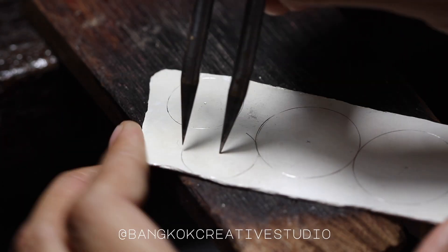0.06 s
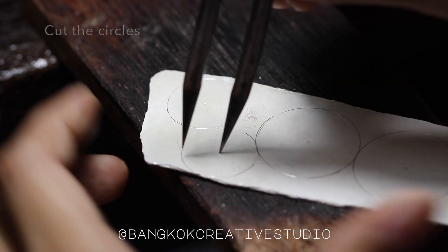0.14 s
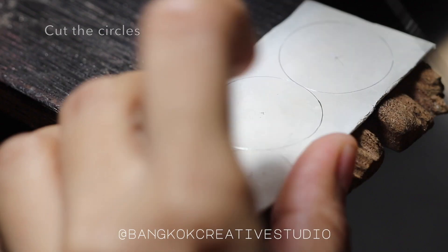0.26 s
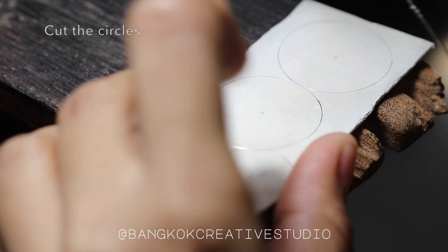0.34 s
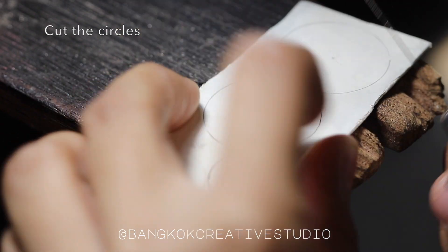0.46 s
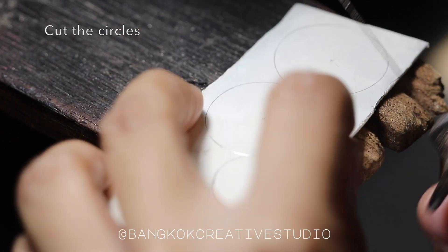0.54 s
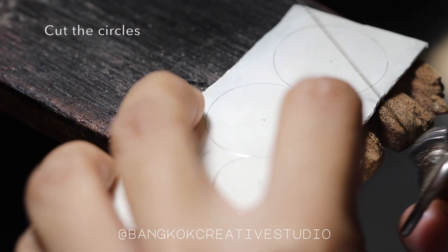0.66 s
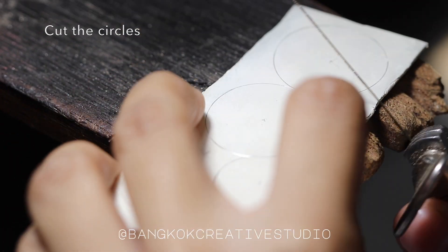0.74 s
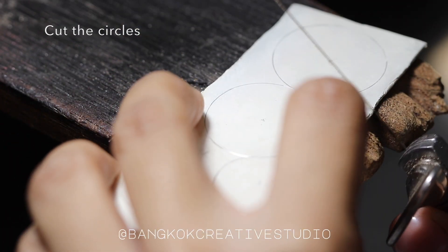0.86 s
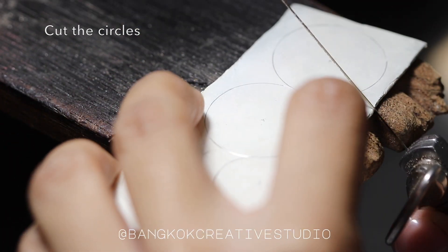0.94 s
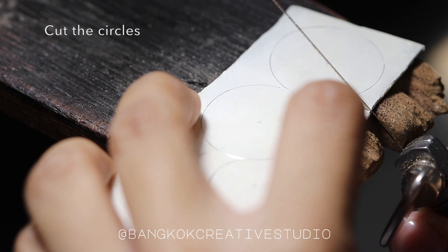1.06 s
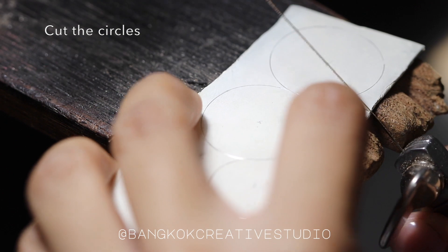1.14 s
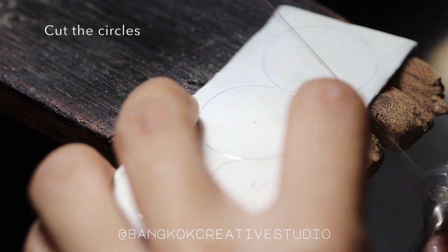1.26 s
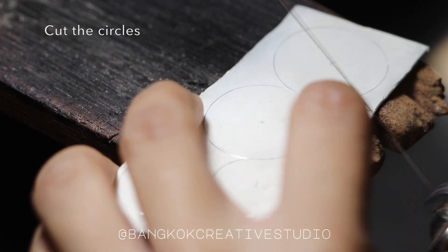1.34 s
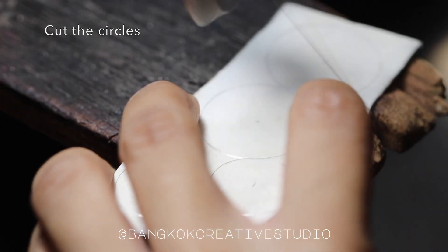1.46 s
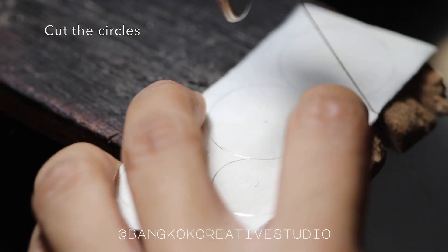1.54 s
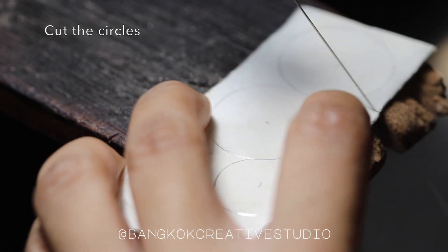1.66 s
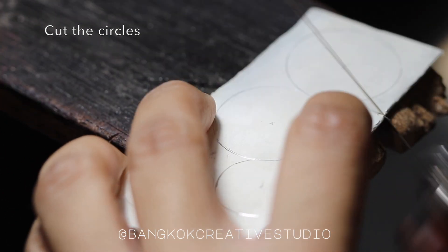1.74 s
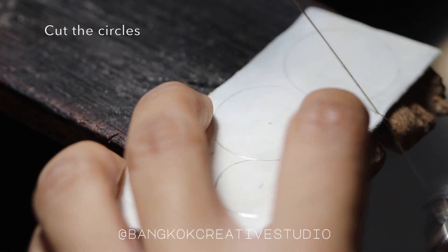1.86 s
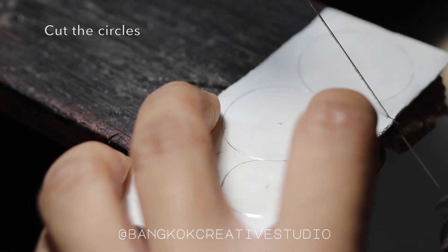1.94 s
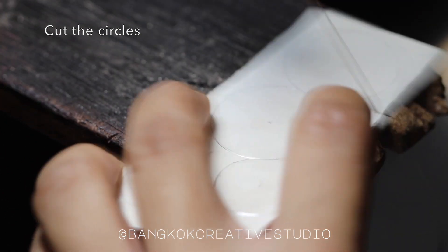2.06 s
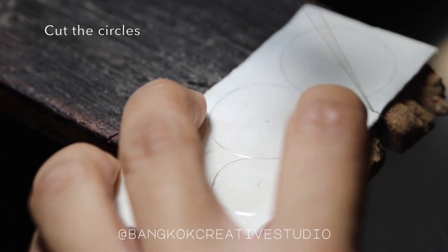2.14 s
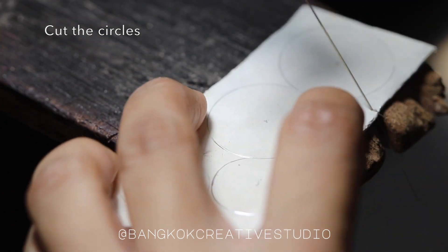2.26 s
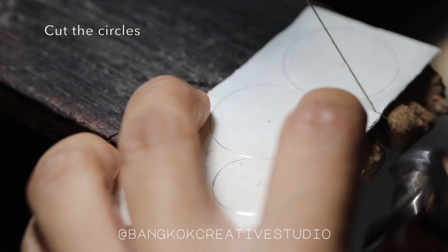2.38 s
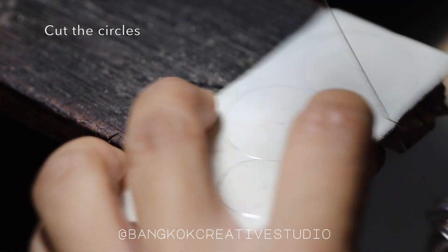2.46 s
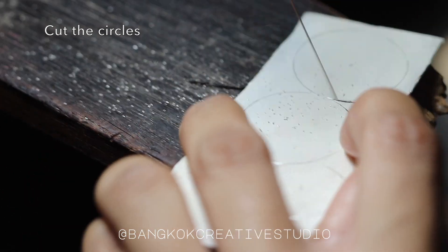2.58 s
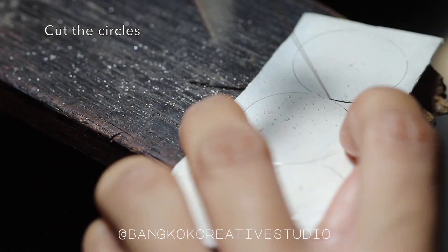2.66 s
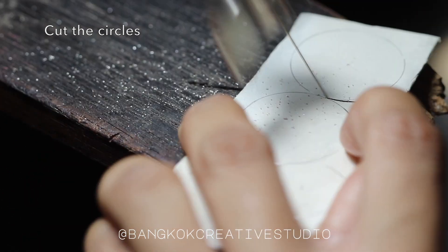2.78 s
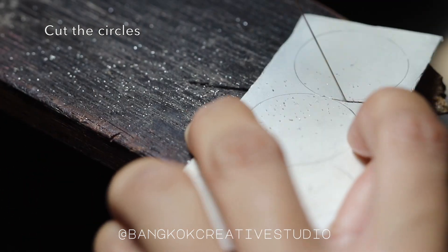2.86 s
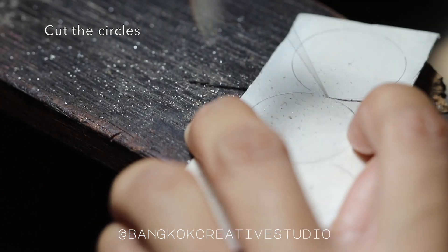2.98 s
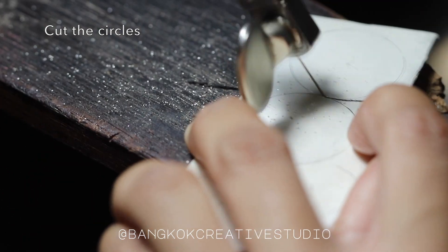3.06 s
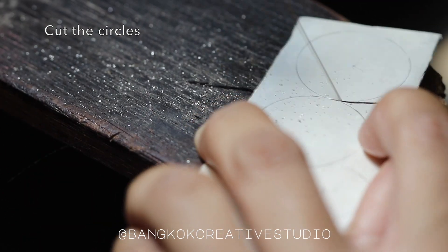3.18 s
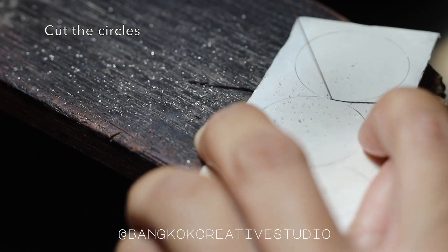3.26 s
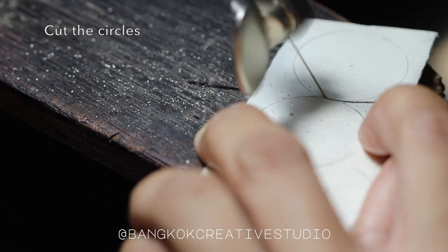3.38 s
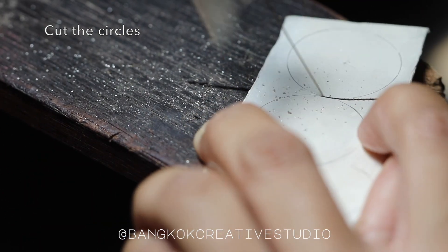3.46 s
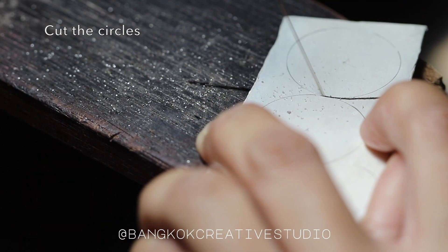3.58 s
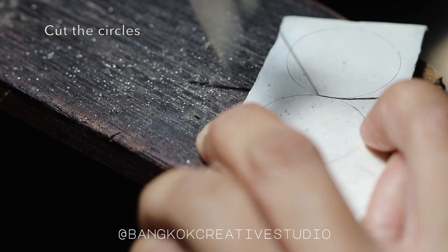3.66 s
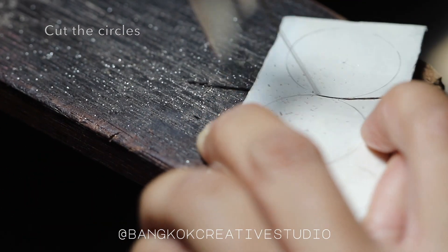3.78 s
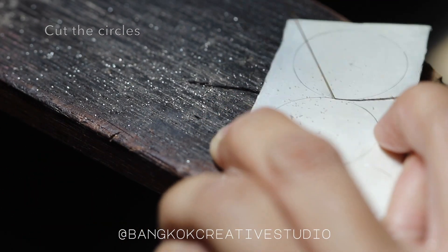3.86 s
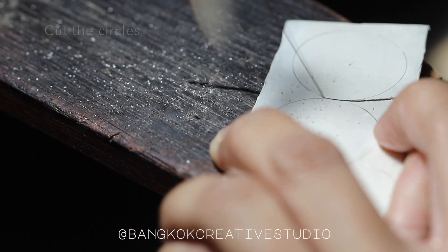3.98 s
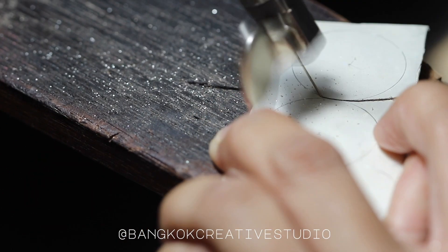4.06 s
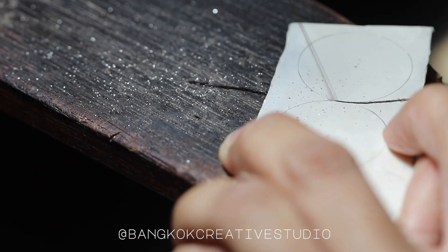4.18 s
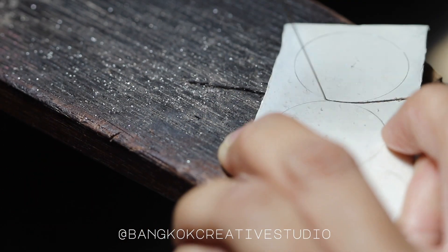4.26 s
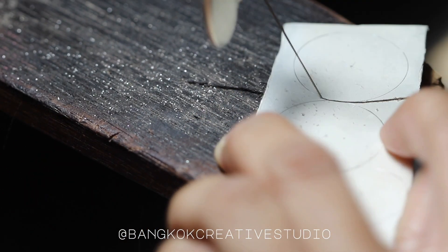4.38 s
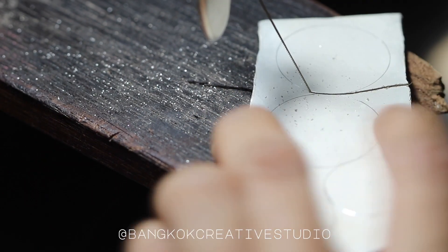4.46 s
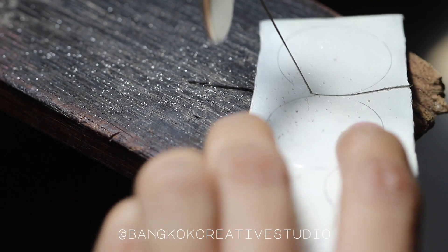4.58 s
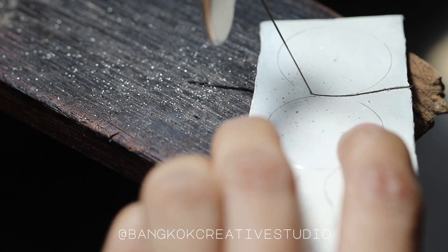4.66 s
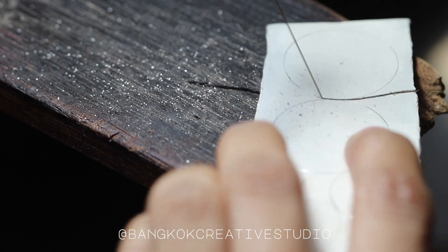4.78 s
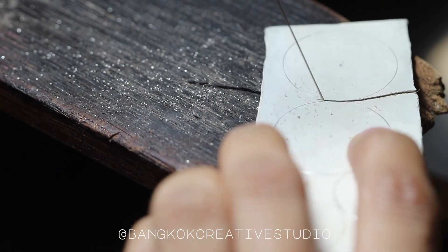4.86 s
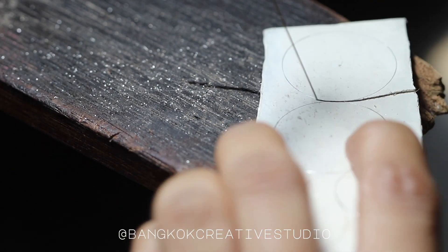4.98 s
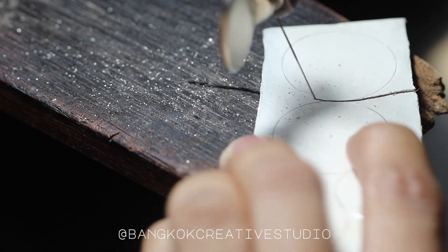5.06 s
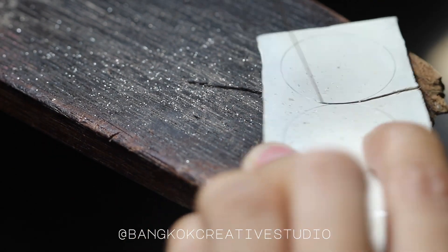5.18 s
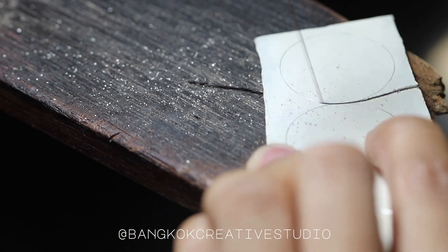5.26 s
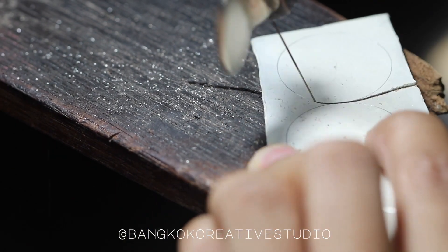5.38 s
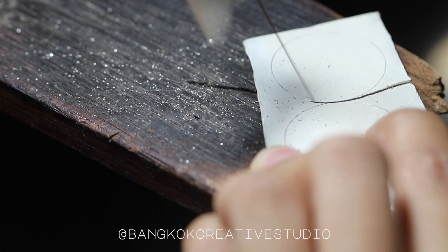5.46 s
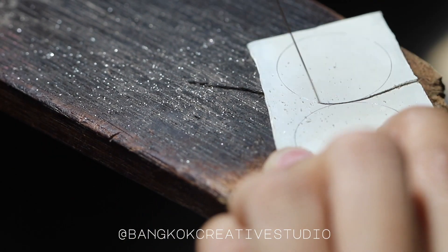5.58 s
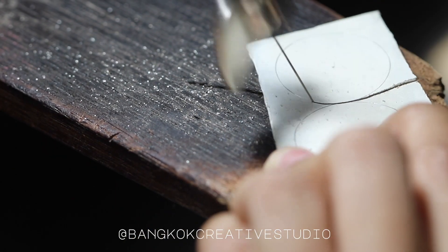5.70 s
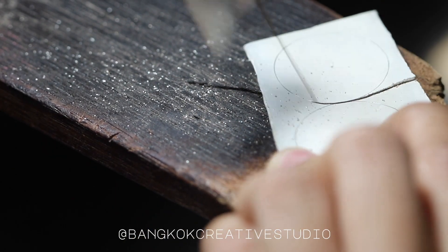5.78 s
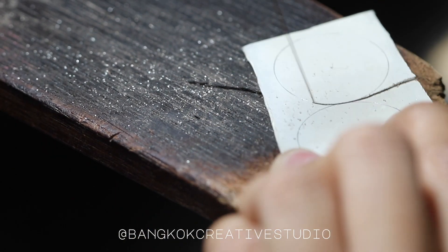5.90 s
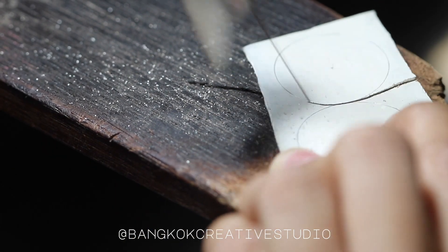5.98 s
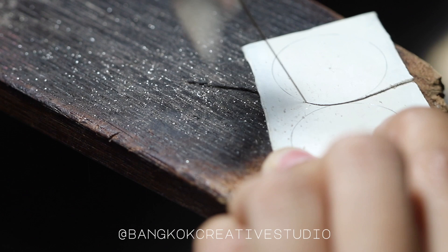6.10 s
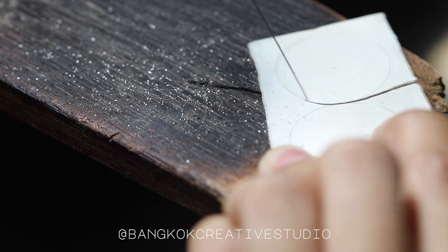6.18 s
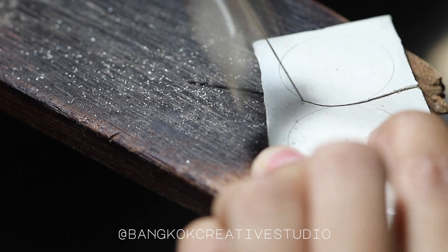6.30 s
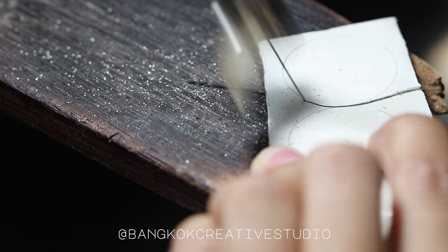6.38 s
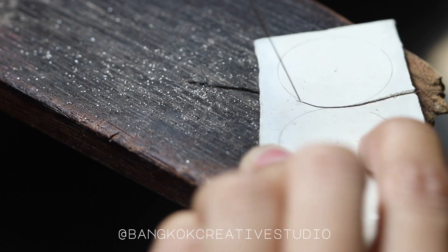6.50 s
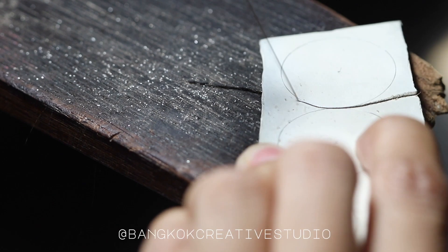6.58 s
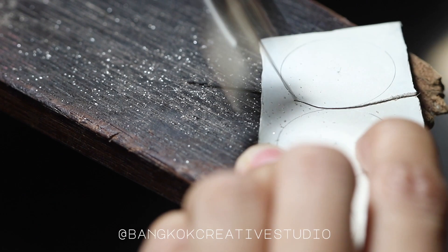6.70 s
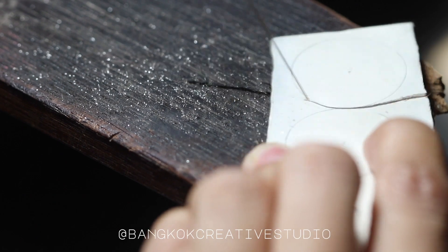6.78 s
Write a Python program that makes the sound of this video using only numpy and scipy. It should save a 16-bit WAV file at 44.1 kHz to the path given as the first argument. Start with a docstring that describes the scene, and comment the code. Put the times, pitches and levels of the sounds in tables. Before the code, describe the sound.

Near-silent workshop hum, then a fine jeweller's saw rasps through thin sheet metal in quick, uneven strokes, gritty and ringing, close up.

```python
"""The soft, wavering hum of a small workshop comes first, with two faint bumps, all made from noise and fading tones.
Then a jeweller's saw cuts sheet metal on a wooden bench pin, close to a stereo microphone.
Each tooth catches and lets go; the jolts ring the pin, the sheet and the taut blade in its frame.
Down-strokes bite hard, up-strokes only scrape; the sheet is gripped anew twice, which shifts its ring.
Short squeaks (one faint and high before the sawing), single ringing modes, a knock and echoes are added."""
import sys
import numpy as np
from scipy import signal
from scipy.fft import rfft, irfft
from scipy.io import wavfile
from scipy.ndimage import uniform_filter1d

SR = 44100
rng = np.random.default_rng(int(sys.argv[2]) if len(sys.argv) > 2 else 0)


def put_to_file(sound):
    """Save the sound as 16-bit audio at rate SR, in the file named by the first command-line argument."""
    columns = np.atleast_2d(sound).T  # one column per channel
    safe = np.clip(columns, -1, 1)
    whole_steps = np.round(safe * 32767)
    wavfile.write(sys.argv[1], SR, whole_steps.astype(np.int16))


N = 301644
T = np.arange(N) / SR

# Colour of the workshop hum: pitch_hz, density_db_per_hz
SHOP_COLOUR = [(15, -65), (25, -44), (125, -14), (158, -14.5), (219, -6.5), (286, -8), (621, -14),
               (691, -17.5), (1060, -19.5), (1150, -19.5), (5140, -42), (7280, -42), (15000, -55.5)]
SHOP_DB = -55
# Faint far bumps: start_s, pitch_hz, t60_s (time to fade 60 dB), level_db
BUMPS = [(0.515, 213, 0.22, -43), (0.554, 353, 0.052, -45)]
# Echoes in bands: pitch_hz, t60_s, level_db (relative), likeness of left and right (0-1)
WALL_BANDS = [(172, 0.95, -12, 0.94), (527, 0.31, -18, 0.3), (1310, 0.6, -5, 0.06), (2660, 0.34, -3.5, 0),
              (6650, 0.4, -10, 0.16), (11500, 0.13, 2, 0.1)]
# Where the saw sits between the microphones: pitch_hz, left_above_right_db
LEFT_RIGHT = [(100, -0.5), (250, -1.5), (500, 0.3), (1000, 1), (2000, -4.5), (4000, -2.5), (8000, -4),
              (15000, -3)]
# Short squeaks, one faint and high before the sawing, the others among the strokes:
# middle_s, pitch_hz, length_s (middle to 1/e), level_db
SQUEAK_TONES = [(1.059, 7120, 0.012, -68), (1.908, 4230, 0.0065, -48), (3.895, 3520, 0.008, -40.5),
                (3.6, 5640, 0.0081, -50), (4.224, 3520, 0.0067, -41), (6.204, 1610, 0.015, -32)]
# Modes that sing out for a while: start_s, rise_s, hold_s, t60_s, pitch_hz, width_hz, glide_octaves,
# level_db, left_lead_rad
SINGING_MODES = [(1.46, 0.015, 0.036, 0.32, 1160, 41, 0.026, -31, 0.34),
                 (2.6, 0.023, 0.053, 0.21, 2200, 28, 0.012, -39.5, -1.2),
                 (2.35, 0.016, 0.031, 0.28, 1900, 40, 0.0068, -29.5, 0),
                 (2.496, 0.007, 0.035, 0.33, 710, 19, 0.053, -29.5, 0.23),
                 (2.493, .005, 0.014, 0.2, 1490, 22, 0.02, -31, .7),
                 (2.66, 0.036, 0.046, 0.61, 1380, 47.6, 0.064, -25.5, -0.39),
                 (2.686, 0.014, 0.025, 0.26, 2400, 49, 0.03, -29.5, -0.13),
                 (2.696, 0.021, 0.04, 0.43, 413, 16, 0.012, -26, 0.44),
                 (3.22, 0.017, 0.1, 0.22, 377, 23, -0.019, -33, 0.4),
                 (3.41, .02, .05, 0.3, 1217, 35, -0.0032, -28.5, 0.99),
                 (3.53, 0.018, 0.026, 0.63, 1040, 30, -0.013, -34.5, 0.93),
                 (3.699, 0.019, 0.063, 0.42, 408, 20, -0.014, -25, -0.1),
                 (3.838, 0.02, 0.012, 0.1, 1010, 59, -0.02, -31, 1),
                 (4.3, 0.025, 0.059, 0.5, 1010, 42, 0.026, -24.5, 0.72),
                 (5.655, 0.011, 0.052, 0.21, 2900, 150, 0, -35, 0.61),
                 (5.36, 0.018, 0.033, 0.18, 2900, 68, 0.015, -40, 0.57),
                 (6.182, 0.017, 0.045, 0.16, 2250, 200, -0.02, -40, 0),
                 (6.506, 0.0076, 0.026, 0.11, 2600, 120, -0.014, -35, 0.51),
                 (5.865, 0.018, 0.028, 0.18, 2624, 70, 0.0065, -41, 0.37),
                 (2.24, 0.022, 0.033, 0.8, 2250, 45, 0.012, -36, -2.3),
                 (2.49, .005, .02, 0.39, 2160, 36, 0.026, -41, -2.4),
                 (1.94, 0.0089, 0.047, 0.27, 590, 54, -0.015, -29, -0.53),
                 (4.9, .02, 0.037, .3, 1960, 60, -0.009, -52, -1),
                 (4.9, 0.014, 0.044, 0.27, 5550, 250, -0.0074, -43, 1),
                 (5.661, 0.021, 0.062, 0.3, 6030, 160, -0.026, -34, 1),
                 (5.987, 0.018, 0.04, 0.17, 6300, 200, 0.027, -45, 1),
                 (5.99, 0.018, 0.029, 0.18, 6300, 180, -0.0006, -44, 1),
                 (6.15, 0.028, 0.076, 0.27, 5600, 120, -0.00032, -43, 1),
                 (6.307, 0.018, 0.044, 0.47, 5500, 180, 0.017, -41, 0.77),
                 (6.314, 0.017, 0.049, 0.48, 3740, 46, -0.032, -38, 1),
                 (6.32, 0.012, 0.077, 0.61, 1640, 120, -0.02, -30, 0.084),
                 (6.642, 0.021, 0.048, 0.32, 1590, 120, 0.044, -24.5, 0.41),
                 (6.65, 0.015, 0.028, 0.24, 5200, 160, 0.08, -40, 1),
                 (6.64, 0.019, 0.058, 0.31, 13700, 700, 0.024, -48, 1),
                 (6.525, 0.0084, 0.0088, 0.081, 11000, 2500, 0, -35, 1),
                 (6.738, 0.015, 0.052, 0.3, 6800, 120, 0.015, -49.5, 1),
                 (6.64, 0.018, 0.03, 0.14, 8100, 87, 0.0073, -32, 1),
                 (6.644, 0.011, 0.025, 0.21, 3730, 130, -0.051, -33, 1)]

# Times when the sheet is gripped anew: start_s
GRIP_S = [2.667, 4.745]
# Ringing modes of each part, in the five tables below:
# pitch_hz, width_hz, first_grip_db, second_grip_db, third_grip_db, left_lead_rad
PIN_MODES = [(138, 7.2, -2.5, -16.5, -14, 0.071), (214, 69, -48, -27.5, -36, 0.037),
             (244, 41.5, 0.5, -10.5, 1, 0.16), (281.5, 28.7, -2.5, 2, 3.5, 0.22),
             (364.7, 26, -0.5, -6, -7, 0.36), (407.3, 26.3, -2, 0, 3.5, 0.12), (568, 152, -3, -6, -2, 0.37)]
SHEET_LOW_MODES = [(667, 106, 14.5, 2, -5.5, 0.0093), (754, 37, 3, 7.5, 9, 0.11),
                   (882, 215, -10.5, 0, -0.5, 0.08), (1028, 76, -5, -7, -4.5, 1),
                   (1135, 22.7, 9, -4, -4.5, 0.19), (1160, 184, -11.5, -6, -6, 1),
                   (1445, 146, -12, -2, -11.5, 0.31), (1573, 114, -11, -1, -6.5, 0.),]
SHEET_HIGH_MODES = [(1762, 100, 4.5, 0, 1.5, 0.44), (1934, 54, -4.5, -24, -3.5, -1.83),
                    (2052, 51, 6, -9.5, -6, -0.6), (2200, 136, 2, -35, -4, -1.9),
                    (2667, 95, 0, -1.5, -8, 1), (2967, 340, -6.5, -6, -9.5, 0.78),
                    (3384, 230, -9.5, -11.5, -18, -0.5), (3704, 350, -12.5, -15, -15, 1)]
BLADE_MODES = [(4470, 530, 6, -4, -58, 1.55), (5160, 170, 2.5, 2, -15, 2.5),
               (5523, 117, -12, -1.5, -2.5, 1.44), (5544, 170, -3, 1.5, -8, 0.72),
               (6633, 123, -14, -0.5, -2, 1.97), (6890, 123, -6, -7, 0.5, 1.3),
               (7530, 230, 5, -2, -7.5, 4.2), (8280, 246, -3, -1, -2, 1.7)]
OVERTONE_MODES = [(9310, 860, -6, -4.5, -4.5, 11), (10280, 270, -8, -20, -15, -5),
                  (11260, 160, 1, -5, -4, -4), (12100, 150, -22, -9, -6, 2), (12600, 190, -20, -10, -6, 1),
                  (13830, 320, -11, -13, -7, -2.5)]  # of the blade
# Overtones against the blade, one value for each grip: level_db
OVERTONES_DB = [-13.5, -10.5, -10]

# The next four tables have one row each for pin, low sheet, high sheet, blade, overtones.
# Random pitch drift as the free length changes, in widths of one filter stage:
# first_grip_widths, second_grip_widths, third_grip_widths
DRIFT_WIDTHS = [(0.068, 0.057, 0.1), (.07, 0.037, 0.063), (0.097, 0.18, 0.22), (.7, 0.6, 0.26),
                (.4, 0.36, 0.37)]
# Rasp that does not ring: first_grip_db, second_grip_db, third_grip_db
RASP_DB = [(-16, -24, -17.5), (-2.5, -3.5, -4.5), (-5.5, -8.5, -6), (-5.5, -4.5, -19), (-1.5, -4, -8.5)]
# Crack of a snag that does not ring: level_db
CRACK_DB = [-12, -8, -7.5, -5, -0.5]
# How a part follows a stroke: rise_share, fade_share, ease_db (quick change as the bite eases),
# turn_db (change as the blade turns), focus_db (change of the favoured mode during the glide)
FOLLOW = [(.95, 0.98, -3.5, 4, 0.5), (1.01, 1.24, -2.5, -3, 6), (1.05, 1.18, -10, -2.5, -13),
          (1.2, 0.44, -16.5, -9, 0), (1.2, 0.54, -13.5, 0, -17)]
# Colour of rasp and crack: pitch_hz, density_db_per_hz
RASP_COLOUR = [(53, -56), (90, -45), (271, 5.5), (329, 10), (409, 1), (508, -7.5), (1740, -6.5),
               (2410, -2.5), (2630, -10), (3960, -14.5), (6800, -8), (13000, -30.5), (14200, -31),
               (15800, -49)]

# A tooth snags and jerks free: start_s, low_sheet_db, and above that pin_db, high_sheet_db, blade_db
SNAGS = [(1.311, -32, 25, -19, -8), (1.349, -23, 3, -6, -6), (1.484, -9.5, 7, 5, 4.5),
         (1.497, -9.5, 6, -15, -15), (1.533, -15, -8, -10, -1), (1.704, -28, -12, 9, 6),
         (1.753, -23, -17, 11.5, 1), (1.936, -12, -14, 2, -11.5), (1.942, -4, -15, -5.5, -10),
         (2.132, -12, 4.5, 4, -9), (2.149, -14, -8, 5.5, -7), (2.155, -2, 1, -6, -13.5),
         (2.165, -4, 0, -9.5, -11), (2.34, -19.5, -6, 0, -0.5), (2.362, -16.5, -13, 3, 2),
         (2.503, -4.5, -23, -1.5, -12), (2.677, -21, -12, -4, -15), (2.834, -26.5, -8, -5, -13),
         (3.018, -9, -28, -0.5, -0.5), (3.068, -7, 5, -4, -16), (3.075, -3.5, 5, -26, -19),
         (3.11, -15.5, 4, -20, -16), (3.137, -13, 5, -12, -12), (3.387, -9.5, -14, -1, 0.5),
         (3.423, -10, -16, -6, 1), (3.461, -15.5, 14, -17, -11), (3.552, -22, -14, 1, 0),
         (3.667, -19, -5, 3, -7), (3.829, -20, -11, -9, -29), (3.858, -26.5, -8, -1, -16),
         (3.949, -28.5, -6, 5.5, -23), (3.993, -18.5, 3, -1.5, 4), (4.281, -37, -5, -16, 8),
         (4.329, -0.5, 9.5, -15, -10), (4.391, -12.5, -8, -2, 3), (4.526, -37, -2, 2, -21),
         (4.752, -37, 12, 8, -29), (4.824, -34, -2, 22, 11), (4.862, -13.5, -11, -14, -8),
         (5.028, -17, 16, 3, -14), (5.221, -24, -3, 2, 8), (5.356, -20, 20, -9, 2),
         (5.399, -5, 5.5, -8, -11), (5.69, -11.5, -3, -15, -13), (5.819, -32, -3, -16, -15),
         (5.891, -31.5, -5, 0, 7), (5.934, -9.5, -4, -23, -22), (5.987, -10, 0, -20, -19),
         (6.006, -9.5, 3, -8, -15), (6.037, -8, -2, -6, -4), (6.088, -14, -3, -21, -24),
         (6.175, -28, -10, 6, 1), (6.198, -21, -10, 2, -2), (6.314, -13, 10, -10, -28),
         (6.414, -13.5, -22, 6, -16), (6.523, -21, -13, 8, 3), (6.541, -16, -20, 5, 7.5),
         (6.557, -20.5, 10.5, -11, 0), (6.637, -3.5, -6, -27, -35), (6.734, -9.5, -21, -6, -30),
         (6.792, -28, -10, -5, -2)]
# Cutting strokes: start_s, rise_s, low_sheet_hold_s, pin_hold_s, high_sheet_and_blade_hold_s,
# fade_db_per_s, low_sheet_db, and above that pin_db, high_sheet_db, blade_db;
# then the favoured modes: sheet_hz, sheet_glide_octaves, pin_hz, pin_glide_octaves, blade_hz
DOWN_STROKES = [(1.302, 0.0082, 0.0036, 0.0076, 0.0035, 550, -34.5, 12.5, 7.5, 2.5, 930, -0.13, 256, 0.012, 5600),
                (1.342, 0.0084, 0.013, 0.019, 0.0062, 220, -30, 7.5, -0.5, -7.5, 710, 0.64, 238, 0.12, 5620),
                (1.468, 0.02, 0.026, 0.053, 0.028, 126, -20, 3.5, -3.5, -3, 1036, -0.081, 314, -0.21, 5760),
                (1.926, 0.0096, 0.022, 0.044, 0.007, 195, -27, -3.5, -1, -7, 815, -1.6, 410, -0.075, 5960),
                (2.129, 0.0031, 0.0044, 0.0035, 0.005, 400, -26, 2.5, 6.5, 3, 1610, -0.06, 283, 0, 5640),
                (2.144, 0.0094, 0.098, 0.09, 0.0095, 131, -23.5, 3, 6, 3.5, 1660, -0.93, 268, -0.38, 5700),
                (2.493, 0.0033, 0.01, 0.038, 0.0046, 185, -22, -4.5, 0.5, -11, 723, -0.28, 338, -0.18, 5000),
                (2.667, 0.029, 0.054, 0.06, 0.046, 130, -23.5, 8, 1, 0.5, 1440, -0.11, 272, 0.45, 6300),
                (3.001, 0.02, 0.0085, 0.017, 0.013, 300, -25.5, -4.5, 3.5, 5, 1620, -1, 388, -0.067, 6640),
                (3.059, 0.0052, 0.092, 0.088, 0.0065, 96, -25, 3, -0.5, 2.5, 795, -0.31, 368, 0.032, 6800),
                (3.334, 0.017, 0.037, 0.08, 0.083, 113.6, -19.5, 5.5, -8, -7.5, 894, 0.64, 310, 0.27, 6500),
                (3.656, 0.026, 0.059, 0.058, 0.053, 141, -20, 2.5, -1, -1.5, 1710, -0.4, 282, 0.36, 6260),
                (3.989, 0.022, 0.072, 0.075, 0.061, 166, -23, -0.5, -0.5, -2, 1543, -0.34, 383, 0.052, 6960),
                (4.319, 0.0081, 0.077, 0.15, 0.078, 176, -23.5, 6.5, -4.5, -5, 968, -0.36, 317, -0.17, 6600),
                (4.848, 0.023, .05, 0.053, 0.048, 263, -26, -6.5, 3, -5.5, 770, -0.066, 270, -0.4, 6600),
                (5.006, 0.035, 0.051, 0.07, 0.036, 148, -21.5, 3.5, -1.5, -3, 1080, -0.008, 291, 0.063, 6700),
                (5.341, 0.022, 0.08, 0.09, 0.058, 183, -20.5, 4, -4.5, -5, 940, 0.14, 334, -0.059, 6080),
                (5.671, 0.014, 0.067, 0.052, 0.057, 169, -17.5, 3.5, -7, -9.5, 945, 0.19, 350, -0.11, 6000),
                (5.971, 0.031, 0.068, 0.1, 0.062, 164, -18, 1, -6, -8, 950, 0.12, 324, 0.42, 6370),
                (6.297, 0.028, 0.054, 0.043, 0.046, 200, -22, 4, -3.5, -3.5, 1090, 0.35, 314, 0.2, 6400),
                (6.619, 0.0041, 0.074, 0.045, 0.091, 210, -25, 11.5, -10.5, -6, 770, 0.54, 390, -0.29, 7400)]
# Return strokes, some in several pushes, and one short knock at 5.929 s:
# start_s, rise_s, hold_s, low_sheet_db, and above that pin_db, high_sheet_db, blade_db;
# then the favoured modes: sheet_hz, pin_hz, blade_hz
UP_STROKES_AND_KNOCK = [(1.695, 0.011, 0.025, -29, -15, 0, -4.5, 790, 244, 4560),
                        (1.746, 0.0071, 0.015, -36, -7, 2, 0, 2230, 244, 5660),
                        (1.79, 0.0099, 0.022, -40.5, -8, 3, -10, 2100, 244, 5630),
                        (2.337, 0.004, 0.0096, -33, -14, 5, 4, 2840, 284, 5470),
                        (2.355, 0.011, 0.03, -27.5, -22, 3.5, 1, 2100, 284, 5300),
                        (2.879, 0.022, 0.02, -39.5, -1, 6, 1, 1500, 313, 6700),
                        (3.201, 0.055, 0.015, -38, -19, 3.5, 0.5, 1080, 356, 5440),
                        (3.535, 0.0033, 0.067, -42.5, -13, 6, 7, 1020, 298, 5700),
                        (3.880, 0.033, 0.031, -43.5, 5.5, 0, -18, 1050, 365, 5790),
                        (4.19, 0.0041, 0.085, -42.5, 3, -0.5, 1, 1230, 312, 8200),
                        (4.749, 0.056, 0.17, -49.5, 8.5, 10.5, 4.5, 1960, 286, 5600),
                        (4.813, 0.024, 0.047, -49.5, 5, 14, 11.5, 1940, 275, 6435),
                        (5.202, 0.0073, 0.056, -38.5, 9, 3.5, 3.5, 1700, 254, 6100),
                        (5.521, 0.0072, 0.15, -51, 11, 5.5, 8, 1000, 318, 6000),
                        (5.594, 0.0096, 0.015, -57, -2, -4, -10, 1040, 320, 5840),
                        (5.860, 0.028, 0.0065, -49, 10, 9.5, 16, 1380, 314.7, 5500),
                        (5.929, 0.0058, 0.0017, -32.5, 4, -10, -2, 710, 436, 5640),
                        (6.157, 0.021, 0.062, -35, -6, -0.5, 0.5, 1530, 318, 5440),
                        (6.248, 0.0041, 0.0095, -31.5, 3, -24, -17, 776, 313, 5800),
                        (6.509, 0.024, 0.016, -31.5, 6.5, 6, 6.5, 1810, 310, 5920)]

# A snag: its force builds over CATCH_S and dies over SKID_S (exponential time constants)
CATCH_S, SKID_S = 0.0013, 0.0041
# Teeth: median rate, spread of the gaps (natural log), spread of the jolts, grit, throb of the force
TEETH_HZ, TEETH_JITTER, TEETH_SPREAD_DB, GRIT_DB, CHATTER_DB = 898.9, 0.55, 5.6, -6, 1.62
# Modes: boost and reach of the favoured one, slow and fast level wander, left-right phase wander
FAVOUR_DB, FAVOUR_OCTAVES, WANDER_DB, BITE_DB, WANDER_RAD = 9.5, 0.24, 3, 3, 1.14
# Strokes: TURN_S is the time before a down-stroke in which the blade turns
UP_FADE_DB_S, RISE_POWER, TURN_S, EASE_S = 225, 0.95, 0.15, 0.019
GLIDE_S = 0.086  # modes slide as the blade runs through
RUMBLE_DB, TOP_HZ = -72, 15900


def undb(db):
    """Turn decibels into a plain amplitude factor."""
    return 10 ** (np.asarray(db) / 20)


def rms(x):
    """Average strength of a signal."""
    return np.sqrt(np.mean(x ** 2))


def unit(x):
    """Scale to rms 1."""
    return x / rms(x)


def colour(x, points):
    """Shape the spectrum by (Hz, dB) points, joined by straight lines over log pitch."""
    hz, db = np.transpose(points)
    size = x.shape[-1]
    f = np.maximum(np.arange(size // 2 + 1) * SR / size, 1)
    gain = undb(np.interp(np.log(f), np.log(hz), db))
    return irfft(rfft(x) * gain, size)


def walk(rate):
    """Random levels, a new one every 1 / rate s, joined by slopes; spread 1."""
    k = int(SR / rate)
    steps = np.repeat(rng.standard_normal(N // k + 1), k)
    return unit(uniform_filter1d(steps, k)[:N])


def bandpass(x, lo, hi):
    """Keep the sound between two pitches."""
    return signal.sosfilt(signal.butter(2, [lo, hi], "bandpass", fs=SR, output="sos"), x)


def shop():
    """Distant workshop hum: coloured noise that wavers a little, plus two faint bumps as fading tones."""
    mid, side = rng.standard_normal((2, N))
    side = colour(side, [(100, -30), (300, -10.5), (1500, 0.5), (15000, 0)])  # bass nearly alike in both ears
    stereo = mid + side * np.array([[1], [-1]])
    hum = colour(stereo, SHOP_COLOUR) * undb(0.7 * walk(25))
    out = hum / rms(hum.mean(axis=0)) * undb(SHOP_DB)
    for start, hz, t60, db in BUMPS:
        t = np.maximum(T - start, 0)
        out = out + undb(db) * np.sin(2 * np.pi * hz * t) * np.exp(-np.log(1000) * t / t60)
    return out


def walls(x):
    """Echoes thicken into a tail that dies band by band; the bass is alike left and right."""
    t, response = T[:SR], 0
    centres = np.array(WALL_BANDS)[:, 0]
    edges = np.sqrt(centres[1:] * centres[:-1])
    for (_, t60, db, like), lo, hi in zip(WALL_BANDS, [60, *edges], [*edges, 18000]):
        mid, side = rng.standard_normal((2, SR))
        tail = np.sqrt(1 + like) * mid + np.sqrt(1 - like) * side * np.array([[1], [-1]])
        fade = np.exp(-np.log(1000) * t / t60) * (1 - np.exp(-t / 0.0019))
        loudness = np.sqrt(2 * np.sum(fade ** 2))
        response = response + undb(db) * bandpass(tail * fade, lo, hi) / loudness
    mono = x.mean(axis=0)[None]
    return signal.fftconvolve(mono, response, axes=1)[:, :N]


def squeaks():
    """Brief rough squeaking tones: sines that swell and fade, with a fast random change of level."""
    rough = 1 + walk(340)
    tones = 0
    for middle, hz, length, db in SQUEAK_TONES:
        swell = np.exp(-((T - middle) / length) ** 2)
        tones = tones + undb(db) * swell * np.sin(2 * np.pi * hz * T)
    return rough * tones


def sings():
    """Tooth jolts hold a single narrow mode ringing; it slides a little as the blade runs through."""
    jolts, out = teeth()[0], np.zeros((2, N))
    for start, rise, hold, t60, hz, width_hz, glide, db, lead in SINGING_MODES:
        a = int(start * SR)
        t = T[:min(N - a, SR // 2)]  # half a second at most
        sliding_hz = hz * 2 ** (glide * np.minimum(t / GLIDE_S, 1))
        spin = np.exp(2j * np.pi * np.cumsum(sliding_hz) / SR)
        pole = np.exp(-np.pi * width_hz / SR)
        # shift the mode to 0 Hz, smooth it there, and shift it back
        z = spin * signal.lfilter([np.sqrt(2 * (1 - pole ** 2))], [1, -pole], jolts[a:a + len(t)] / spin)
        fade_db = -60 * np.maximum(t - rise - hold, 0) / t60
        z = z * np.minimum(t / rise, 1) * undb(db + fade_db)
        out[:, a:a + len(t)] += np.imag(z * np.exp(0.5j * lead * np.array([[1], [-1]])))
    return out


def teeth():
    """Uneven jolts of the teeth; the blade chatters, so their force throbs."""
    gap, size, sign = np.clip(rng.standard_normal((N // 20, 3)), -2.2, 2.2).T
    at = np.cumsum(SR / TEETH_HZ * np.exp(TEETH_JITTER * gap)).astype(int)
    strength = undb(TEETH_SPREAD_DB * size) * np.sign(sign)
    jolts = np.zeros(N)
    jolts[at[at < N]] = strength[at < N]
    return unit(jolts), undb(CHATTER_DB * walk(45))


def strokes():
    """Give each part its force (rise, hold, ease, fade, change at the turn) and its favoured mode."""
    # lay out up-strokes and knock like down-strokes: one hold for all, a fixed fade, no glides
    ups = [(*r[:3], r[2], r[2], UP_FADE_DB_S, *r[3:8], 0, r[8], 0, r[9]) for r in UP_STROKES_AND_KNOCK]
    rows = np.array(sorted([*DOWN_STROKES, *ups]))
    rise_share, fade_share, ease_db, turn_db, focus_db = (c[:, None] for c in np.transpose(FOLLOW))
    power = np.zeros((len(FOLLOW), N))
    for start, rise, hold, pin_hold, treble_hold, fade, db, pin_db, high_db, blade_db, *_ in rows:
        a = int(start * SR)
        t = T[:min(N - a, SR // 2)]  # half a second at most
        part_rise = rise * rise_share
        part_hold = np.array([[pin_hold], [hold], [treble_hold], [treble_hold], [treble_hold]])
        after = np.maximum(t - part_rise - part_hold, 0)
        fall_db = ease_db * (1 - np.exp(-after / EASE_S)) - fade * fade_share * after
        overtone_db = blade_db + OVERTONES_DB[np.searchsorted(GRIP_S, start + rise)]
        top_db = db + np.array([[pin_db], [0], [high_db], [blade_db], [overtone_db]])
        force = np.minimum(t / part_rise, 1) ** RISE_POWER * undb(top_db + fall_db)
        power[:, a:a + len(t)] += force ** 2
    starts = np.append(np.transpose(DOWN_STROKES)[0], T[-1] + 1)
    to_next = starts[np.searchsorted(starts, T)] - T
    turning = np.maximum(1 - to_next / TURN_S, 0)
    now = rows[np.maximum(np.searchsorted(rows[:, 0], T) - 1, 0)].T  # the latest row at each moment
    run = np.clip((T - now[0]) / GLIDE_S, 0, 1)
    sheet_hz, sheet_glide, pin_hz, pin_glide, blade_hz = now[-5:]
    sheet_hz = sheet_hz * 2 ** (sheet_glide * run)
    pin_hz = pin_hz * 2 ** (pin_glide * run)
    favoured_hz = [pin_hz, sheet_hz, sheet_hz, blade_hz, blade_hz]
    return np.sqrt(power) * undb(turn_db * turning), favoured_hz, focus_db * run


def ring(force, modes, favoured_hz, focus_db, drift):
    """Damped modes share the force by grip and cut; each reaches the two microphones with its own phase."""
    grip, out = np.searchsorted(GRIP_S, T), 0
    hz, width_hz, *db, lead = (c[:, None] for c in np.transpose(modes))
    # width of each of two filter stages, which keep the valleys between modes dark
    width_hz = width_hz / np.sqrt(np.sqrt(2) - 1)
    distance = np.log2(favoured_hz / hz) / FAVOUR_OCTAVES
    favour_db = (FAVOUR_DB + focus_db) * np.exp(-distance ** 2)
    wander_db = [WANDER_DB * walk(9) + BITE_DB * walk(50) for _ in modes]
    share = undb(np.hstack(db)[:, grip] + favour_db + wander_db)
    # together they ring at the level of the force
    share = share / np.sqrt(np.sum(share ** 2 * np.pi * width_hz / SR / 8, axis=0))
    for k, pole in enumerate(np.exp(-width_hz * np.pi / SR)[:, 0]):
        drifting_hz = hz[k] + width_hz[k] * np.array(drift)[grip] * walk(8)
        spin = np.exp(2j * np.pi * np.cumsum(drifting_hz) / SR)
        # shift the mode to 0 Hz, smooth it there twice, and shift it back
        z = spin * signal.lfilter([(1 - pole) ** 2], [1, -2 * pole, pole ** 2], force * share[k] / spin)
        # long bass waves reach both microphones alike, so their phase wanders less
        phase = lead[k] + WANDER_RAD * min(hz[k, 0] / 1200, 1) * walk(25)
        turn = np.exp(0.5j * phase)
        out = out + np.array([np.imag(z * turn), np.imag(z / turn)])
    return out


def saw():
    """Tooth jolts, grit and snags drive pin, sheet and blade, each with its own share."""
    at, snag_db, snag_pin_db, snag_high_db, snag_blade_db = np.transpose(SNAGS)
    snag_overtone_db = snag_blade_db + np.array(OVERTONES_DB)[np.searchsorted(GRIP_S, at)]
    (jolts, chatter), out = teeth(), 0
    t = T[:SR // 40]
    skid = np.exp(-t / SKID_S) * (1 - np.exp(-t / CATCH_S))  # a few teeth skid at once
    grip = np.searchsorted(GRIP_S, T)
    # modes, snag level above the low sheet in dB, lowest and highest Hz of the rasp
    parts = [(PIN_MODES, snag_pin_db, 140, 600),
             (SHEET_LOW_MODES, 0, 600, 1700),
             (SHEET_HIGH_MODES, snag_high_db, 1700, 4200),
             (BLADE_MODES, snag_blade_db, 4200, 9000),
             (OVERTONE_MODES, snag_overtone_db, 9000, 15500)]
    settings = zip(parts, RASP_DB, CRACK_DB, DRIFT_WIDTHS, *strokes())
    for (modes, hit_db, lo, hi), rasp_db, crack_db, drift, push, favoured_hz, focus_db in settings:
        force = unit((jolts + undb(GRIT_DB) * rng.standard_normal(N)) * chatter)
        hits = np.zeros(N)
        hits[(at * SR).astype(int)] = undb(snag_db + hit_db)
        snag = 0.44 * signal.fftconvolve(hits, skid)[:N] * rng.standard_normal(N)
        drive = force * push + snag
        rasp = colour(bandpass(drive, lo, hi), RASP_COLOUR)
        crack = colour(bandpass(snag, lo, hi), RASP_COLOUR)
        plain_level = rms(colour(bandpass(force, lo, hi), RASP_COLOUR))
        out = out + ring(drive, modes, favoured_hz, focus_db, drift)
        out = out + undb(rasp_db)[grip] * rasp / plain_level
        out = out + undb(crack_db) * crack / plain_level
    return out * undb(-1.0)


def scene():
    """The saw near, its echoes, the workshop behind."""
    near = saw() + sings() + squeaks()
    # half of the left-right difference goes to each side
    placed = [colour(x, np.array(LEFT_RIGHT) * [1, side / 2]) for x, side in zip(near, (1, -1))]
    return np.array(placed) + walls(near) + shop()


def record(dry):
    """Round the peaks, thin the deep bass, add a faint rumble that swells with the sound, cut the top."""
    rounded = np.tanh(1.154 * dry) / 1.233
    bass_cut = signal.butter(4, 150, "highpass", fs=SR, output="sos")
    thin = signal.sosfilt(bass_cut, rounded) + undb(-20.5) * rounded
    noise = rng.standard_normal((2, N))
    rumble = unit(colour(noise, [(20, -10), (50, -2), (75, -10), (110, -40), (20000, -95)]))
    swell = unit(uniform_filter1d(np.abs(dry).mean(axis=0), SR // 4) ** 0.5)
    top_cut = signal.ellip(10, 0.2, 80, TOP_HZ, fs=SR, output="sos")
    return signal.sosfilt(top_cut, thin + undb(RUMBLE_DB) * swell * rumble)


dry = scene()
out = record(dry)
put_to_file(out)
```